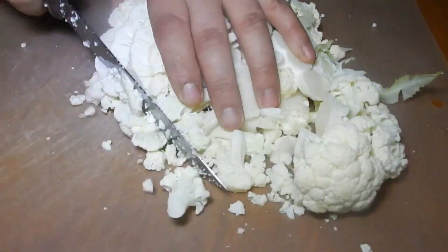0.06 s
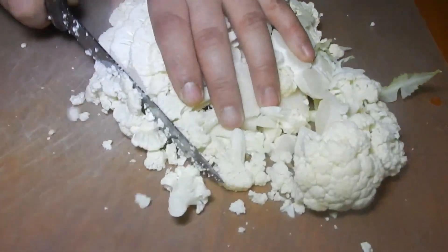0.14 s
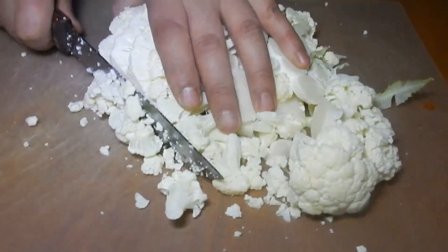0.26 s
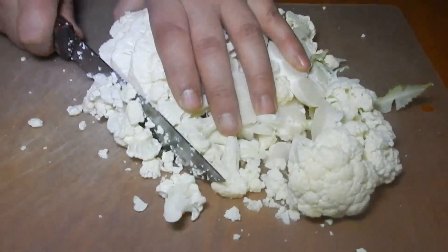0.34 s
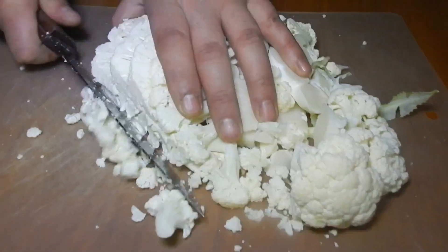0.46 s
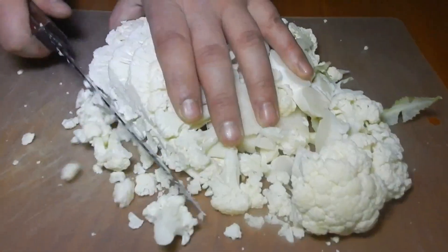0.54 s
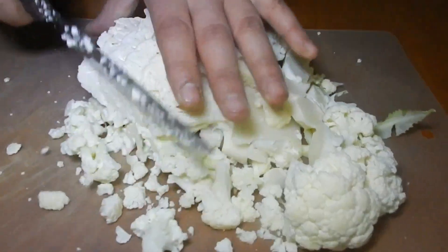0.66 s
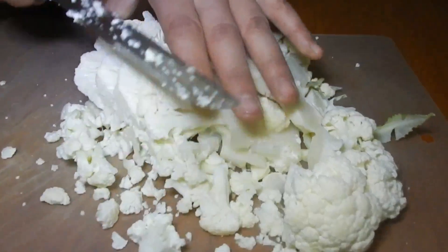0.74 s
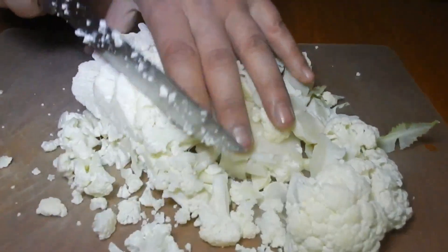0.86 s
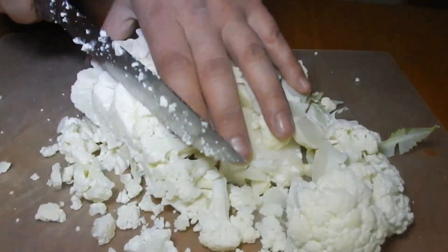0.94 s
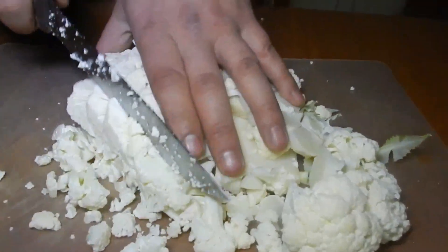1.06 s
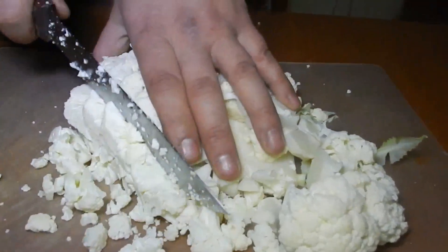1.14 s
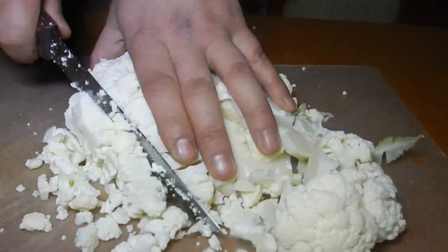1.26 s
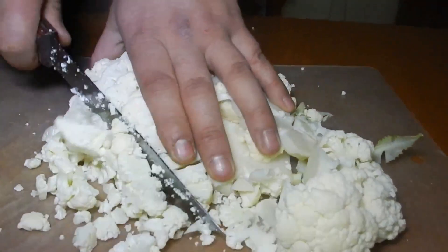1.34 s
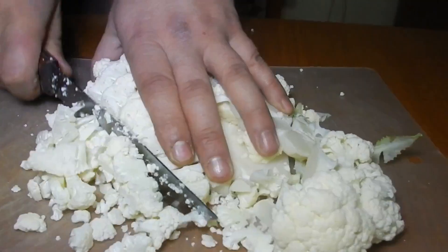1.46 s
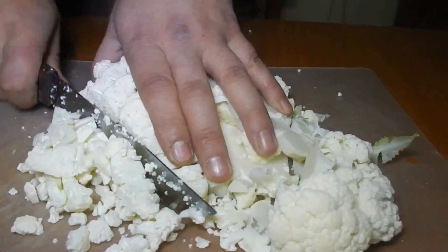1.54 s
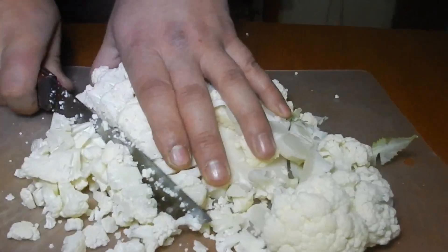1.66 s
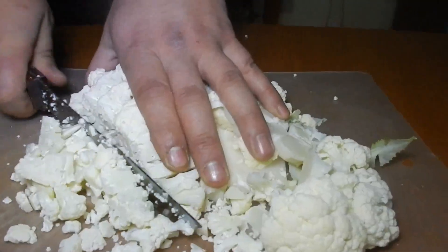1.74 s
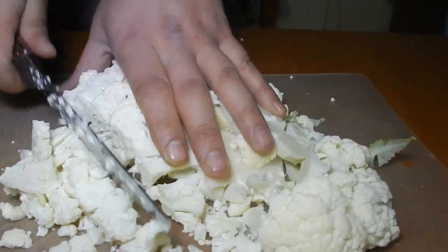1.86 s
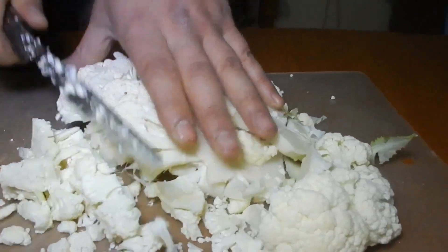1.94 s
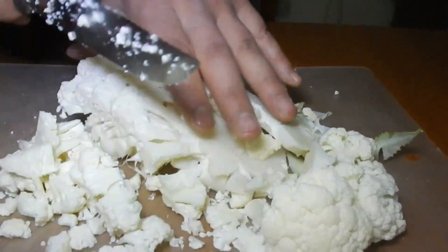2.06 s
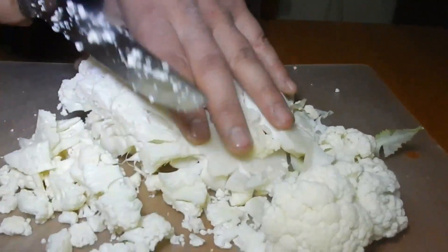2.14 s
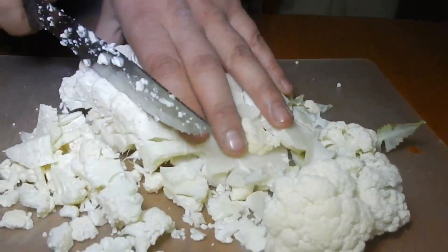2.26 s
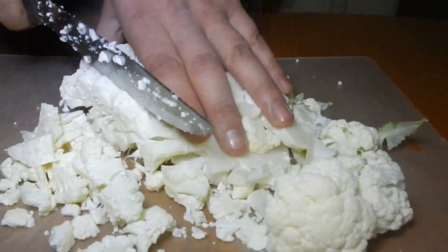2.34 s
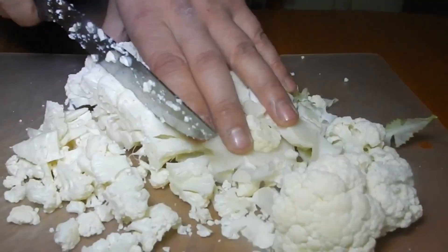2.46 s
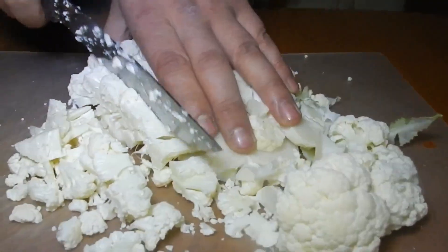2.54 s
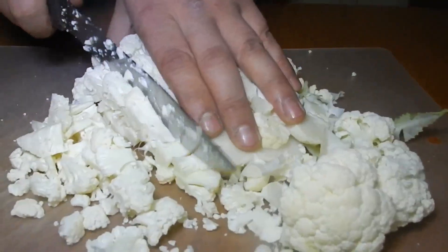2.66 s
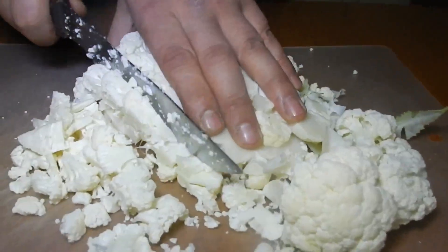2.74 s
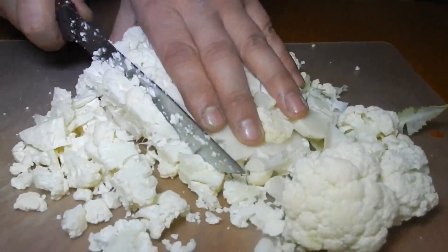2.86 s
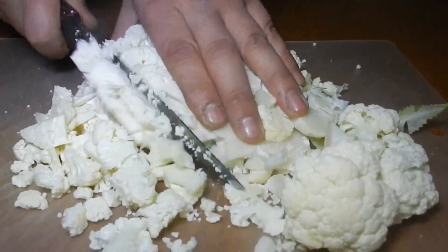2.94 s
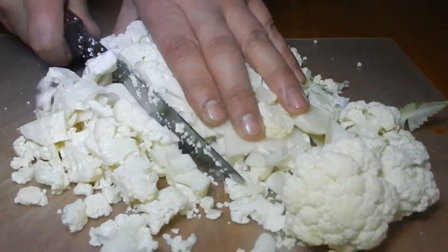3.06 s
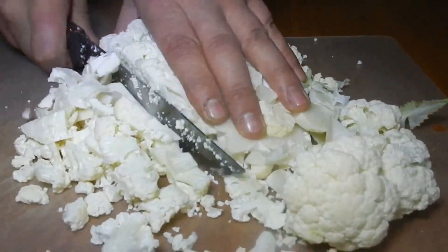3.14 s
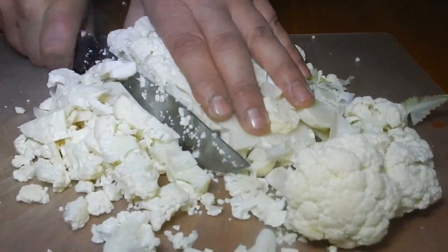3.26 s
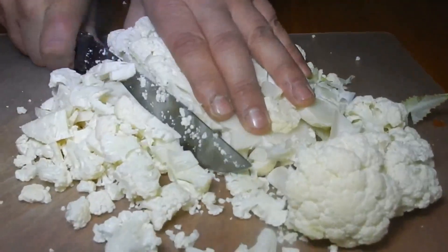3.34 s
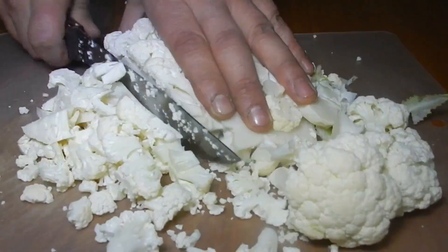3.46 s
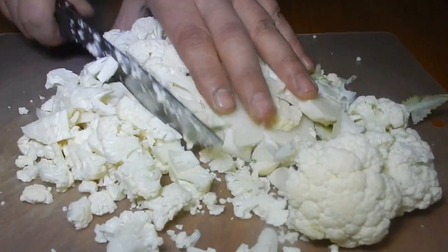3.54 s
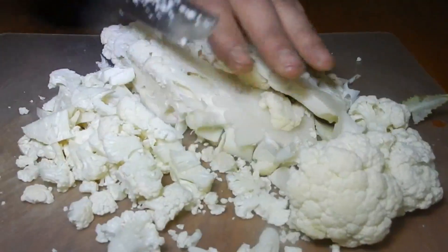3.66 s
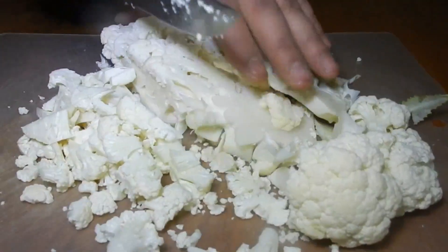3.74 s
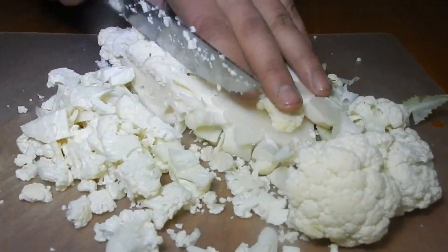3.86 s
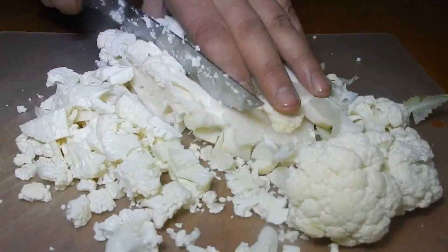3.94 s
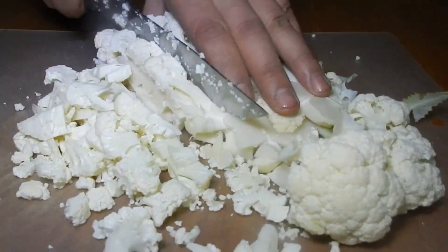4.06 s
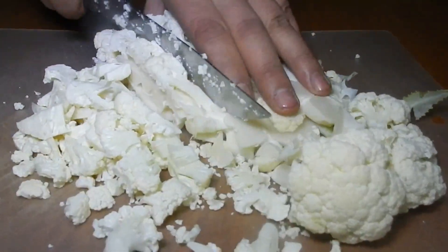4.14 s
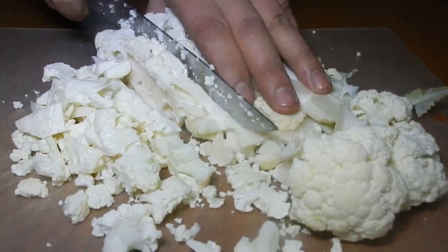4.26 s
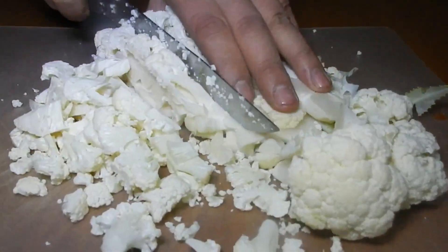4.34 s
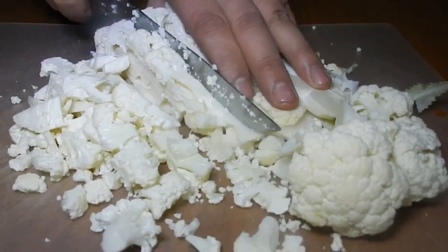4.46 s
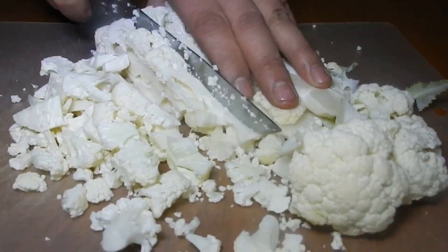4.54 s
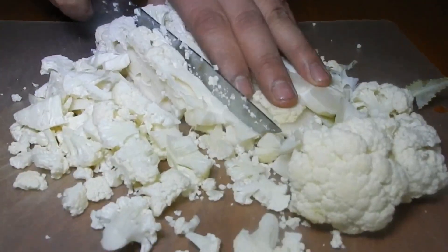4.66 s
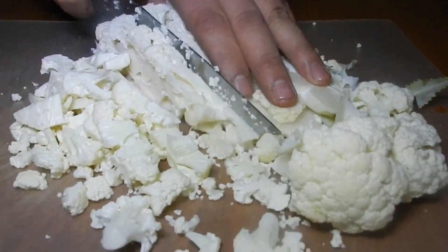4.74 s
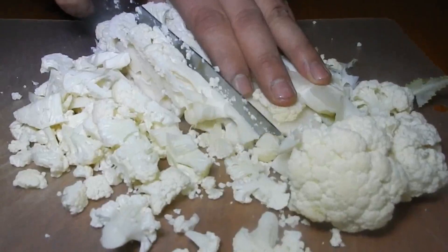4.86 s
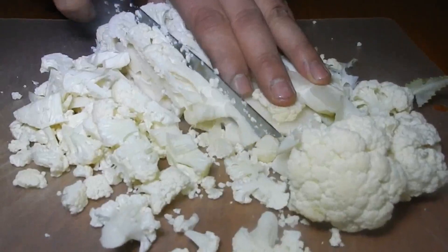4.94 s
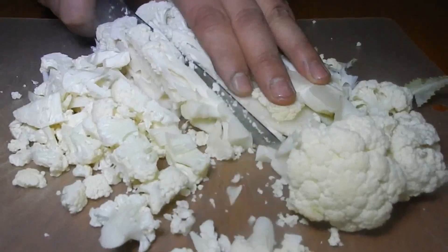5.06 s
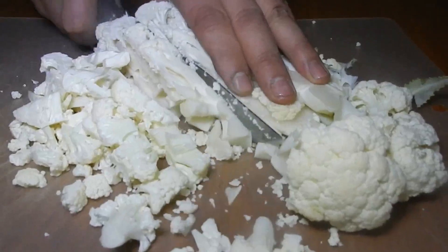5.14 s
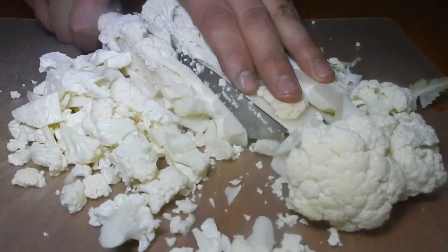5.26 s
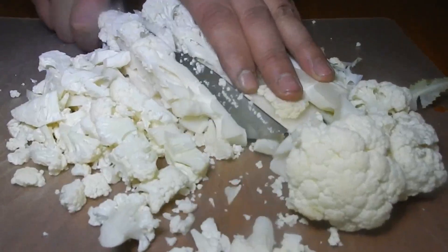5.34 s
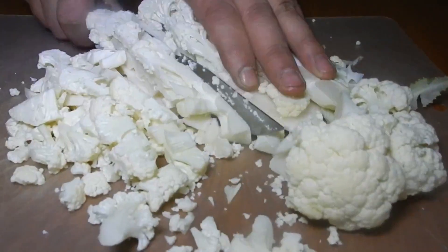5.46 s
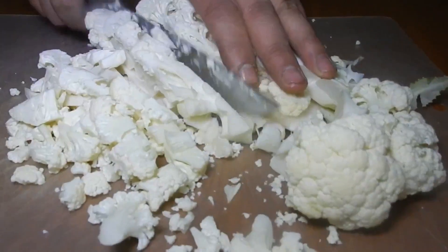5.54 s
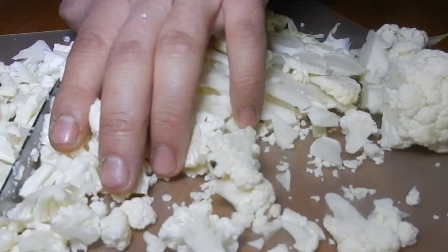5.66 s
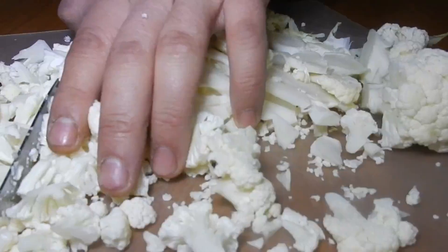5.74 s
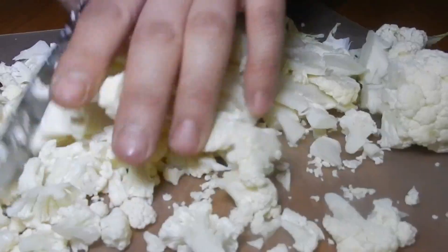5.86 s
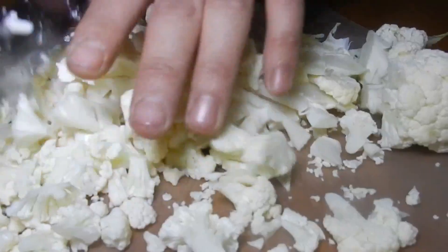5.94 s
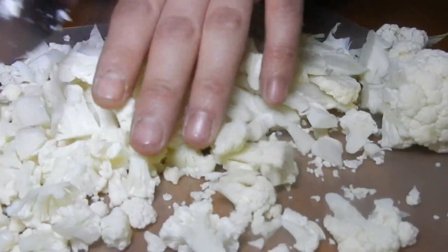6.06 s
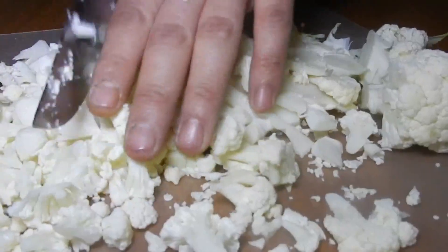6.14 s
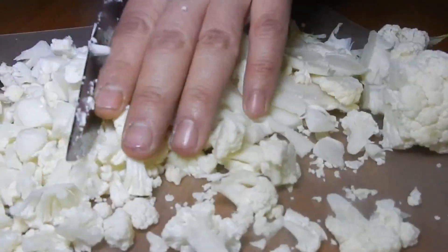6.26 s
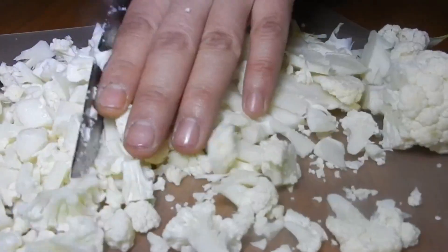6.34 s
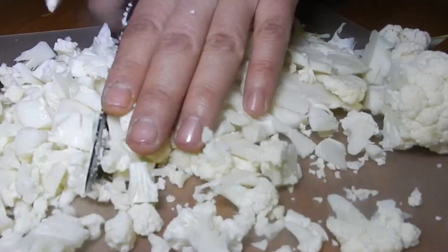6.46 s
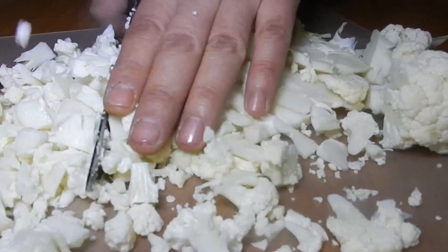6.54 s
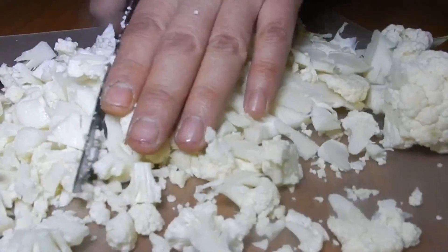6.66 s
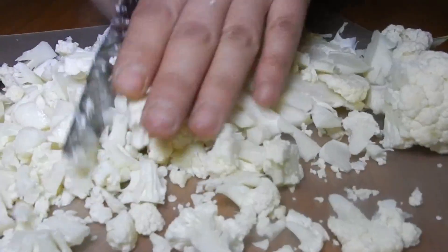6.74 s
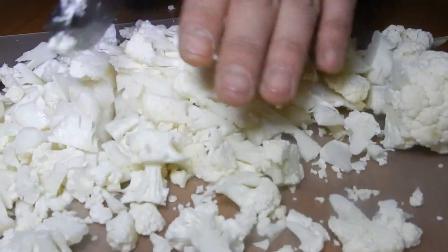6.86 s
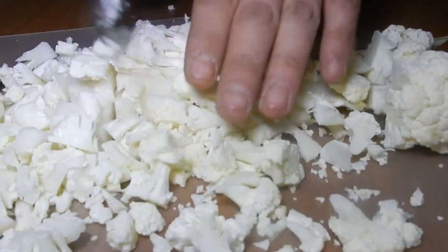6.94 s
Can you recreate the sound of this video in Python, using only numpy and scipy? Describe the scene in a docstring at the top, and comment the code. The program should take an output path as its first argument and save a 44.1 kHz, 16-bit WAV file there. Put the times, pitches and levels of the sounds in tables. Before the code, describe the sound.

Close, irregular chopping of raw cauliflower: crisp cracks and crumbling, low table thumps and short knife knocks on a plastic mat.

```python
"""Cutting raw cauliflower

A knife is pushed down through cauliflower on a plastic mat on a wooden table, in a small kitchen.
Florets crack and crumble, the table top thrums under the push, the blade knocks on the mat
and the room rings on. Low hums come and go; a faint hiss and whine stay underneath."""
import sys
import numpy as np
from scipy import signal
from scipy.fft import rfft, irfft
from scipy.io import wavfile

SR = 44100
rng = np.random.default_rng(int(sys.argv[2]) if len(sys.argv) > 2 else 0)


def file_out(sig):
    """Save sig as 16-bit WAV at sys.argv[1]."""
    # one column per channel
    cols = np.atleast_2d(sig).T
    # limit, then scale
    lim = np.clip(cols, -1, 1)
    pcm = np.round(lim * 32767).astype(np.int16)
    wavfile.write(sys.argv[1], SR, pcm)


N = 308700   # 7 s


def from_db(db):
    """Decibels to gain."""
    return 10 ** (np.asarray(db) / 20)


def unit_rms(x):
    """Normalise to rms 1."""
    return x / np.sqrt(np.mean(x ** 2) + 1e-20)


def at_hz(curve, hz):
    """Read a curve on a log frequency axis."""
    freqs, values = np.transpose(curve)
    return np.interp(np.log(np.maximum(hz, 1)), np.log(freqs), values)


def automation(rows, column):
    """One column of a timed table as a curve, read at every sample."""
    rows = np.array(rows)
    return np.interp(np.arange(N) / SR, rows[:, 0], rows[:, column])


def eq(x, curve):
    """Shape a sound with an EQ curve in dB."""
    gain = from_db(at_hz(curve, np.fft.rfftfreq(len(x), 1 / SR)))
    return irfft(rfft(x) * gain, len(x))


def butter(x, hz, kind, order=2):
    """Butterworth low, high or band pass."""
    return signal.sosfilt(signal.butter(order, hz, kind, fs=SR, output="sos"), x)


def resonance(x, hz, width):
    """Two-pole resonance with unity gain at its peak."""
    r = np.exp(-np.pi * width / SR)
    gain = (1 - r * r) / 2
    return signal.lfilter([gain, 0, -gain], [1, -2 * r * np.cos(2 * np.pi * hz / SR), r * r], x)


def drift(hz):
    """Smooth random modulation of rms 1."""
    r = np.exp(-2 * np.pi * hz / SR)
    return unit_rms(signal.lfilter([1], [1, -2 * r, r * r], rng.standard_normal(N + SR))[SR:])


def grains(per_s, spread_db):
    """Random clicks of uneven size and sign."""
    sizes = from_db(spread_db * np.minimum(rng.exponential(1, N), 4)) * rng.choice([-1, 1], N)
    return sizes * (rng.random(N) < per_s / SR)


# two thin tones and a high hiss: f/Hz, width/Hz, rms level/dB
WHINE_BANDS = [(1810, 3.0, -76), (1870, 3.0, -77.5), (5000, 990, -82.5)]


def whine():
    """A faint, steady bed of noise ringing in resonances."""
    white = rng.standard_normal(N)
    return sum(from_db(db) * unit_rms(resonance(white, hz, width)) for hz, width, db in WHINE_BANDS)


# hands and crumbs stirring between strokes: t/s, rustle level/dB, thrum level/dB, tearing level/dB
STIRRING = [(0, -40.5, -17, -60), (.5, -50.5, -41, -64.5), (1, -59.5, -50, -67), (1.5, -45.5, -38, -70.5),
            (1.8, -61.5, -49, -68), (2.5, -59.5, -51, -70), (3.4, -51, -61.5, -76.5),
            (3.7, -72.5, -67.5, -84), (4.2, -65, -63.5, -73.5), (4.9, -52, -54, -73),
            (5.5, -66.5, -58, -84), (6.2, -69, -67, -79.5), (6.45, -60, -45.5, -72.5), (7, -68, -67, -83.5)]
# tone of the rustle: f/Hz, level/dB
RUSTLE_EQ = [(300, -14.5), (500, -4), (850, -5), (1800, -7.5), (2500, -10), (4800, -15.5), (6500, -28),
             (15000, -40)]


def rustle():
    """Stirring hands and crumbs make a patchy hiss."""
    level_db = automation(STIRRING, column=1) + 3.4 * drift(4.6)
    return from_db(level_db) * unit_rms(eq(rng.standard_normal(N), RUSTLE_EQ))


# low hums: start t/s, end t/s, f/Hz, level/dB
HUMS = [(0.635, 0.818, 169, -38.5), (1.757, 2.378, 104, -54.5), (4.415, 4.69, 150, -39)]


def hums():
    """Low tones with 35 ms fades, wavering in pitch and level."""
    t, out = np.arange(N) / SR, 0
    for start, end, hz, db in HUMS:
        phase = 2 * np.pi * np.cumsum(hz * (1 + drift(10) / 70)) / SR
        fade = np.clip(np.minimum(t - start, end - t) / 0.035, 0, 1)
        out += from_db(db + 4.5 * drift(7.1)) * fade * np.sin(phase)
    return out


# reverb time of the kitchen: f/Hz, t60/s
ROOM_DECAY = [(100, 0.15), (300, 0.65), (700, 0.24), (1800, 0.56), (4800, 0.25), (12000, 0.12)]
# tone of the reverb: f/Hz, level/dB
ROOM_EQ = [(100, -40.5), (500, -12.5), (1000, -20.5), (1900, -13.5), (4000, -19.5), (7000, -30),
           (12000, -46)]
EARLY_DB, EARLY_T60_S = 4, 0.1   # the first echoes stand out of the tail and die sooner


def kitchen(send):
    """Dense echoes: noise that dies away in half-octave bands, starting after the first wall."""
    t, tail = np.arange(SR // 2) / SR, 0
    edges = 60 * 2 ** np.arange(0, 8.1, .5)
    for low, high in zip(edges, edges[1:]):
        hz = np.sqrt(low * high)
        band = butter(rng.standard_normal(len(t)), [low, high], "band")
        tail += band * from_db(at_hz(ROOM_EQ, hz) - 60 * t / at_hz(ROOM_DECAY, hz))
    onset = np.clip((t - .003) / 0.0012, 0, 1)   # 3 ms pre-delay
    early_lift = 1 + from_db(EARLY_DB - 60 * t / EARLY_T60_S)
    return signal.fftconvolve(send, tail * onset * early_lift * from_db(-21.5))[:N]


# the blade bears down or drags:
# start t/s, end t/s, thrum level/dB at start and end, tearing level/dB at start and end
STROKES = [(0, 0.058, -30, -24, -41.5, -46), (0.125, 0.328, -39, -34, -55.5, -55),
           (0.63, 0.764, -38.5, -39.5, -60, -67), (1.118, 1.306, -30, -21.5, -59.5, -37.5),
           (1.447, 1.66, -38, -39, -58.5, -60), (2.626, 2.76, -24, -30, -46, -52.5),
           (2.777, 2.974, -24.5, -27.5, -43, -51.5), (3.228, 3.373, -43, -46.5, -88, -53),
           (4.002, 4.198, -37, -42.5, -63, -62), (4.271, 4.443, -27, -44, -46, -56),
           (4.498, 4.685, -24.5, -44.5, -50.5, -66.5), (4.736, 5.05, -34.5, -44, -59, -59.5),
           (5.16, 5.377, -42.5, -43, -62, -61), (6.252, 6.494, -35, -30, -65, -52.5)]


def stroke_envelope(resting_db, columns, rise_db_per_s, fall_db_per_s):
    """Level in dB: each stroke rises out of the stirring, slides between two levels and falls away."""
    t, level_db = np.arange(N) / SR, resting_db
    for stroke in np.array(STROKES):
        start, end = stroke[:2]
        fades_db = rise_db_per_s * np.minimum(t - start, 0) - fall_db_per_s * np.maximum(t - end, 0)
        level_db = np.maximum(level_db, np.interp(t, [start, end], stroke[columns]) + fades_db)
    return level_db


# the blade drops a step and jolts the table: t/s, level/dB
JOLTS = [(0.316, -40), (1.292, -14.5), (1.596, -27), (2.293, -47), (2.631, -27), (2.771, -13.5),
         (2.887, -22), (4.02, -31), (4.273, -44), (4.501, -16.5), (5.033, -10.5), (5.257, -27),
         (6.344, -30), (6.387, -25), (6.465, -19)]
# modes of the wooden top: f/Hz, width/Hz, level/dB
TABLE_MODES = [(67, 36, -2.5), (107, 58, 1.5), (141.6, 40, 4), (204.6, 35, 1.5), (263.8, 29, 3.5),
               (350, 150, -5.5), (445, 243, -5)]


def table_thrum():
    """The blade slips in soft jerks and drops in jolts; both shake the table's low modes."""
    resting_db = automation(STIRRING, column=2)
    push_db = stroke_envelope(resting_db, columns=[2, 3], rise_db_per_s=391, fall_db_per_s=220.5)
    jerks = from_db(push_db) * unit_rms(grains(150, spread_db=1))
    for s, db in JOLTS:
        jerks[round(s * SR)] += from_db(db + 25.5)
    force = butter(jerks, [50, 450], "band")
    return sum(from_db(db + 17.5) * resonance(force, hz, width) * (-1) ** k
               for k, (hz, width, db) in enumerate(TABLE_MODES))


# blade hits: t/s, level/dB, hollow-mode trim/dB, direct trim/dB (down where mostly the room's ring of the knock
# is heard)
KNOCKS = [(.06, -2, 3.5, 1), (0.328, -12.5, -2.5, -8), (0.717, -32, 9, 0.5), (1.33, 0.5, 1.5, 1),
          (1.566, -36.5, 4, 10), (1.603, -15, -6.5, -4), (2.8, -7, 3.5, -8), (3.002, -0.5, -5.5, 5.5),
          (3.33, -16.5, 14.5, -7), (3.348, -14.5, 7.5, 2.5), (4.374, -30.5, 13, -14), (4.727, -21, -7, 3.5),
          (4.791, -26.5, 12.5, -7), (5.056, -1.5, -3.5, 4), (5.343, -20.5, 13, -3.5),
          (5.721, -12.5, -2, -12.5), (6.4883, -1.5, -5, 4.5)]
# modes of the plastic mat: f/Hz, level/dB, t60/s
MAT_MODES = [(470, -4, 0.017), (623, -6.5, 0.021), (730, -4, 0.0052), (1105, -7, 0.015),
             (1215, -1.5, 0.026), (1467, -8.5, 0.016), (1669, -2.5, 0.017), (2063, 2.5, 0.0074),
             (3260, -6, 0.0095)]
ECHO_BLUR = 1.6   # the mat's modes are wider in the reverb send by this factor squared


def mat_knocks():
    """The edge lands along its length, striking each mode twice. Returns direct sound and reverb send."""
    s, level_db, hollow_db, direct_db = np.transpose(KNOCKS)
    out = np.zeros((2, N))
    touches = (len(s), len(MAT_MODES), 2)
    scatter_db = rng.normal(0, 4.1, touches)
    lag_s = rng.random(touches) ** 2 * [.0002, .003]
    for k, (hz, db, t60) in enumerate(MAT_MODES):
        strength = from_db(level_db + db - 13.5 + hollow_db * (hz < 900))
        at = np.round((s[:, None] + lag_s[:, k]) * SR).astype(int)
        direct, send = np.full((2, N), 1e-18)
        for touch in range(2):
            direct[at[:, touch]] += strength * from_db(direct_db + scatter_db[:, k, touch])
        send[at[:, 0]] += strength * 2 * ECHO_BLUR   # the echoes blend both touches into one blow
        w = 2 * np.pi * hz / SR
        for path, (clicks, damping) in enumerate([(direct, 1), (send, ECHO_BLUR ** 2)]):
            r = from_db(-60 * damping / (t60 * SR))
            out[path] += signal.lfilter([0, np.sin(w)], [1, -2 * r * np.cos(w), r * r], clicks)
    return butter(out, [250, 4000], "band")


# single crumbs: t/s, peak level/dB, f/Hz
CRUMB_TICKS = [(.328, -30, 3500), (0.5298, -33, 3150), (.8008, -47, 8000), (3.257, -28.5, 3550),
               (1.44, -30, 2980), (4.238, -36, 7940), (4.357, -33, 7000), (5.323, -42, 6000),
               (5.46, -47.5, 3820), (5.6361, -52, 3200), (6.0566, -47, 4470)]


def crumb_ticks():
    """Each crumb ticks: a millisecond of noise through a wide resonance."""
    out = np.zeros(N + SR)
    for s, db, hz in CRUMB_TICKS:
        puff = rng.standard_normal(256) * np.exp(-np.arange(256) / 30)
        width = 0.37 * hz
        tick = resonance(resonance(puff, hz, width), hz, width)
        out[round(s * SR):][:256] += from_db(db) * tick / abs(tick).max()
    return out[:N]


# florets cracking: t/s, level/dB, length/s, dull-band trim/dB
FLORET_CRACKS = [(0.025, -35.5, 0.033, 1), (0.057, -24.5, 0.00041, 6), (0.285, -37, 0.0042, -6),
                 (0.295, -31, 0.0029, 1), (0.303, -28.5, 0.0018, 3), (1.123, -45, 0.014, -0.5),
                 (1.155, -32.5, 0.01, -2.5), (1.1854, -32, 0.0034, -1), (1.227, -37, 0.0051, -5),
                 (1.26, -41, 0.0079, -4), (1.274, -27.5, 0.01, -3), (1.289, -32, 0.015, -7),
                 (1.315, -24.5, 0.014, 0.5), (1.329, -19, 0.0029, 6), (1.6, -47, 0.0032, 17.5),
                 (1.565, -35.5, 0.0004, 12.5), (1.909, -52, 0.0084, -3), (2.624, -48, 0.019, -32),
                 (2.6495, -36.5, 0.014, -24), (2.668, -32, 0.0035, -23), (2.707, -34.5, 0.0031, -17),
                 (2.766, -24, 0.011, -7), (2.782, -37.5, 0.013, -2), (2.7977, -32, 0.002, 13.5),
                 (2.878, -31, 0.0027, -6), (2.9278, -31, 0.0079, 1.5), (2.9864, -19, 0.017, 2),
                 (3.326, -30.5, 0.0063, -3.5), (3.3447, -26.5, 0.0042, -7), (4.0034, -51, 0.026, -17),
                 (4.019, -38, 0.0044, -14), (4.129, -48.5, 0.0081, -1), (4.2597, -36.5, 0.006, 0),
                 (4.275, -34, 0.0066, -7), (4.315, -29.5, 0.0022, -16), (4.347, -37.5, 0.00088, 10),
                 (4.375, -29, 0.0013, 8), (4.378, -33, 0.012, 5), (4.501, -27, 0.0029, 3.5),
                 (4.563, -33, 0.0021, 0.5), (4.728, -43.5, 0.0022, 14.5), (4.7926, -27, 0.00061, 9.5),
                 (4.8277, -29, 0.00057, 7.5), (4.903, -39.5, 0.0044, 7.5), (4.982, -52, 0.0019, 17.5),
                 (5.027, -31, 0.014, 5), (5.045, -17, 0.01, 3), (5.3406, -19, 0.0018, -1.5),
                 (6.272, -51.5, 0.021, -2.5), (6.3863, -37, 0.0033, -7), (6.391, -53.5, 0.038, 6.5),
                 (6.463, -37.5, 0.026, 4), (6.485, -31.5, 0.0016, 14.5)]
# tone of the tearing cells: f/Hz, level/dB
CRUNCH_EQ = [(600, -6.5), (1200, -9.5), (3400, -3), (5300, -1.5), (9000, -4.5), (16000, -11)]


def crunch():
    """Cells tear in a clumped crackle; each floret that breaks is a dense burst that stops short."""
    resting_db = automation(STIRRING, column=3)
    tear_db = stroke_envelope(resting_db, columns=[4, 5], rise_db_per_s=349.5, fall_db_per_s=901)
    clumping_db = np.clip(0.033 * (tear_db + 69), 1.5, 6)   # harder tearing comes in spurts
    snaps_per_s = np.clip(12 * (tear_db + 72), 15, 250)   # single crumbs snap out of the tearing
    snaps = np.convolve(abs(grains(snaps_per_s, spread_db=4.5)), np.hanning(90))[:N]
    bright_gain = from_db(tear_db + clumping_db * drift(61)) * (1 + snaps)
    dull_gain = bright_gain.copy()
    t = np.arange(SR // 16) / SR
    for s, db, length, dull_db in FLORET_CRACKS:
        at = round(s * SR)
        attack, release = t / 0.0017, (length + 0.0024 - t) / 0.0032
        burst = from_db(db) * np.clip(np.minimum(attack, release), 0, 1)[:N - at]
        bright_gain[at:at + len(t)] += burst
        dull_gain[at:at + len(t)] += burst * from_db(dull_db)
    crackle = eq(grains(7000, spread_db=3), CRUNCH_EQ)
    dull = butter(crackle, 4000, "low")
    flutter = from_db(2.4 * drift(300))   # bursts are themselves made of smaller snaps
    return flutter * (dull_gain * unit_rms(dull) + bright_gain * unit_rms(crackle - dull))


# stereo width: f/Hz, side level/dB relative to mid
WIDTH_EQ = [(100, -29.5), (1000, -20), (3000, -17.5), (5000, -8), (12000, -9)]
# stereo balance: f/Hz, left level/dB relative to right
BALANCE_EQ = [(500, 0), (2000, -0.6), (5000, -0.5), (8000, 3.5), (14000, 4.5)]


def scene():
    """Everything close up and almost centred; knocks and crunch feed the kitchen reverb."""
    knocks, knock_send = mat_knocks()
    florets = crunch() + crumb_ticks()
    low_end = table_thrum() + hums()
    reverb = kitchen(knock_send + 0.72 * florets)
    mid = knocks + florets + low_end + reverb + rustle() + whine()
    # left and right differ by an ever-changing shift of phase
    side = drift(40) * eq(signal.hilbert(mid).imag, WIDTH_EQ)
    balance = np.array(BALANCE_EQ)
    return np.array([eq(mid + side, balance * [1, .5]), eq(mid - side, balance * [1, -.5])])


# dips in the microphone's response: f/Hz, width/Hz, depth (0-1)
MIC_NOTCHES = [(2460, 50, 1), (4000, 400, .6)]
CUTOFF_HZ = 16500


def record(dry):
    """Output chain: two notches, a hard clip at full scale, a low cut and a steep high cut."""
    notched = dry
    for hz, width, depth in MIC_NOTCHES:
        notched = notched - depth * resonance(notched, hz, width)
    thinned = butter(np.clip(notched, -1, 1), 40, "high", order=1)
    return signal.sosfilt(signal.cheby2(12, 70, CUTOFF_HZ, fs=SR, output="sos"), thinned)


dry = scene()
out = record(dry)
file_out(out)
```